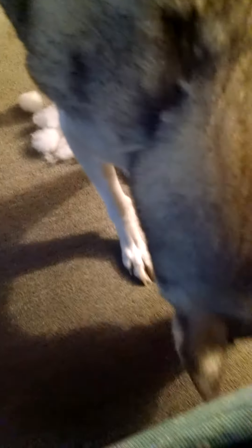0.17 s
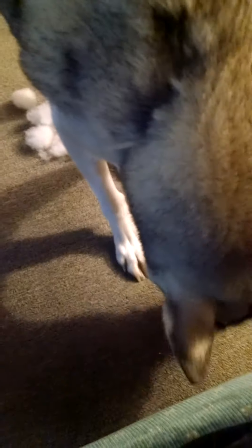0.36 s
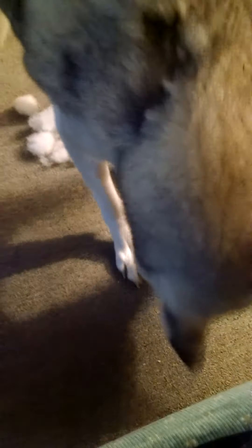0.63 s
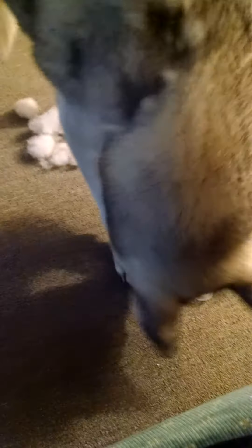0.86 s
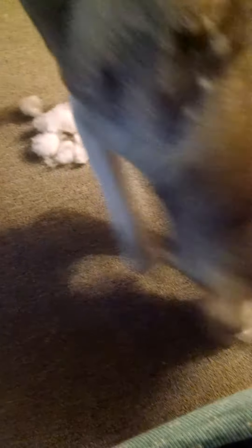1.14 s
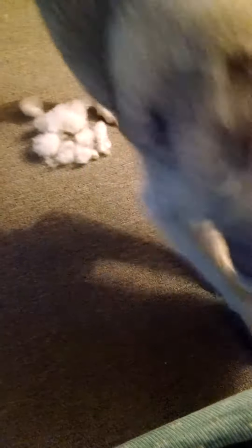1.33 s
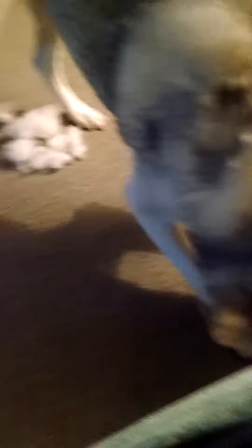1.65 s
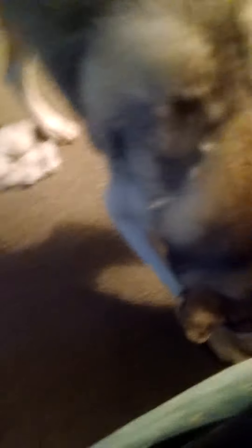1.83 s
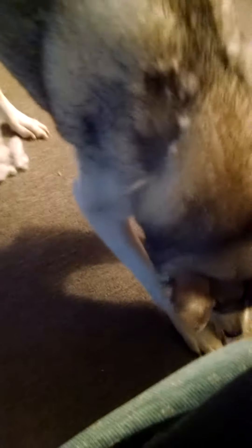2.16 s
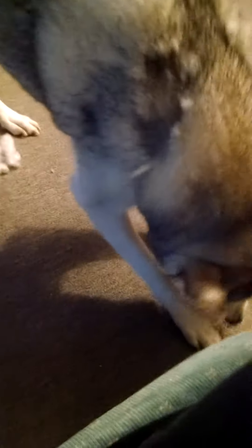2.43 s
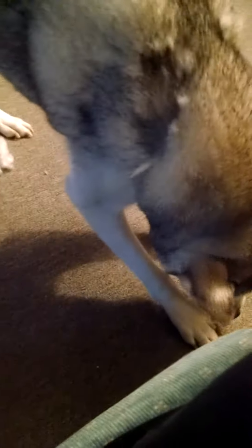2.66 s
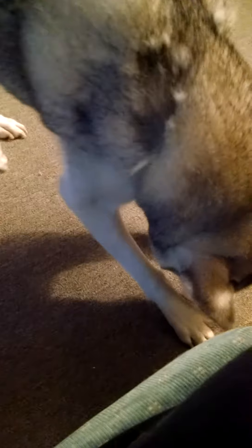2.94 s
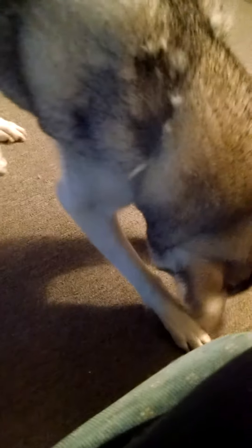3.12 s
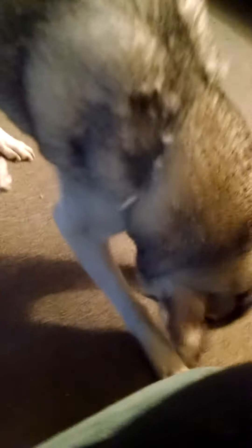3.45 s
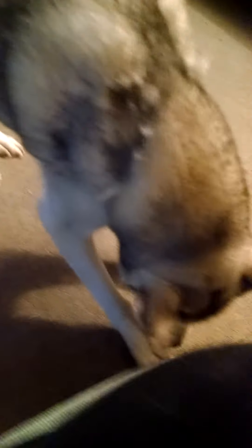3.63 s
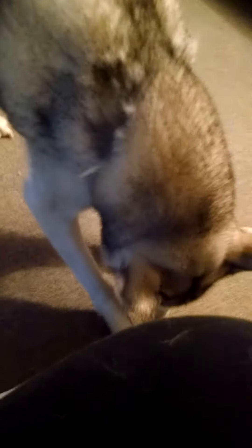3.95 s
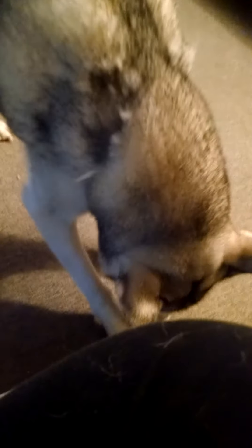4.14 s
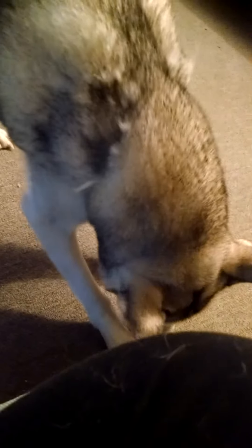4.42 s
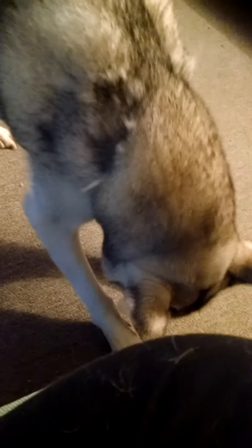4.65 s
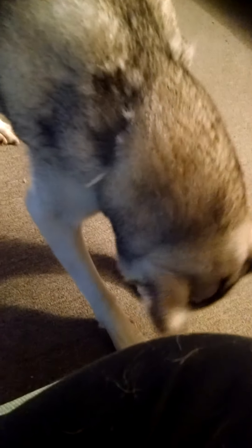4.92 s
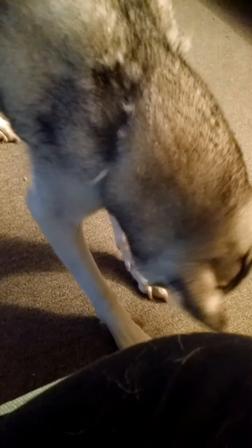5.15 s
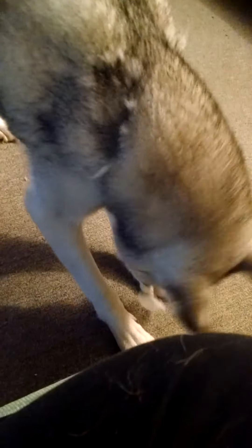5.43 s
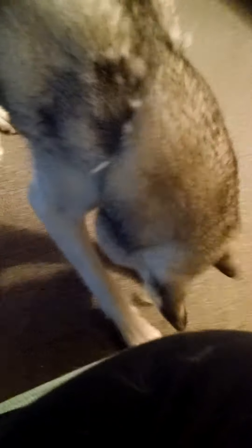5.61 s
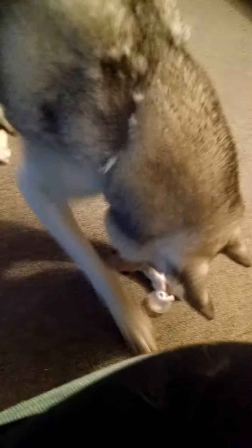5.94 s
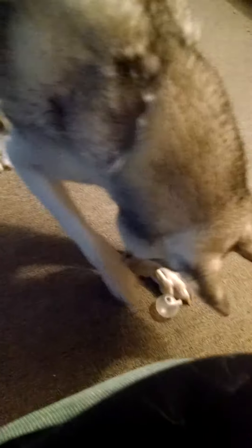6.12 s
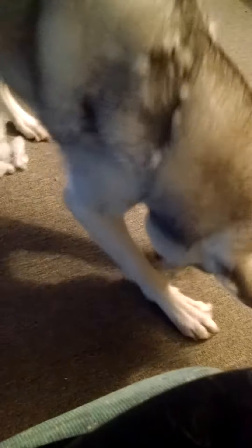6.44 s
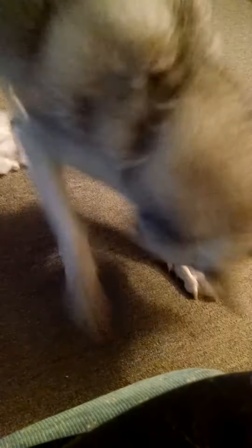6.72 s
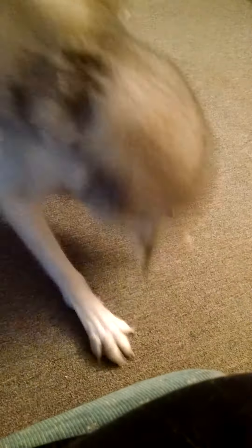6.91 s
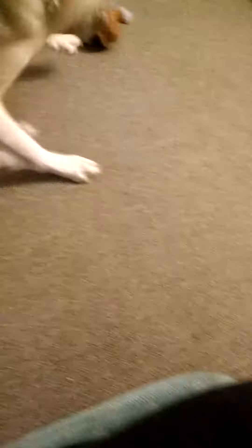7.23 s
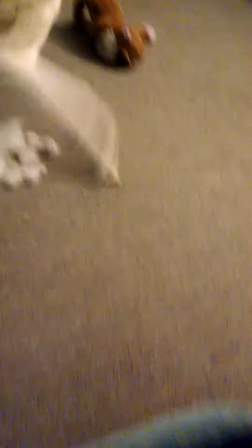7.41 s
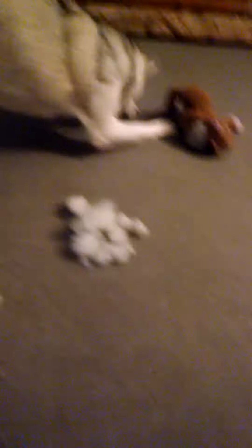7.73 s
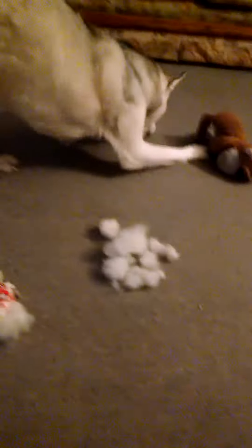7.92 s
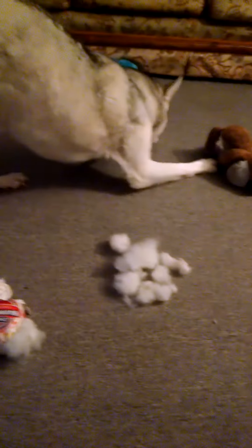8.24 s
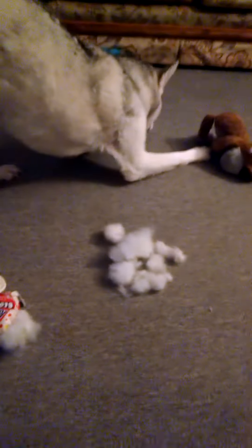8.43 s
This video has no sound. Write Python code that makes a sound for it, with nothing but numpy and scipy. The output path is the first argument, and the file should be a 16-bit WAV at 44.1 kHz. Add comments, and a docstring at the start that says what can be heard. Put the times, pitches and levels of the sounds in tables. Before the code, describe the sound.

A large dog bites a squeaky toy on carpet in a small living room, close to a handheld microphone. Brief raspy chirps come singly and in pairs, with small tooth clicks and a soft muffled whine midway. After a sparse stretch, paws and claws clatter, thump and scuff in a pounce, then sharp new squeaks. Low room murmur underneath.

```python
"""Dog and squeaky toy

A big dog chews a squeaky toy on the carpet of a small living room, close by.
Each bite drives air through a reed, a sum of harmonics whose pitch sags with the air pressure.
Teeth, toy and claws click as damped resonances; the dog whines once as a few unsteady harmonics.
Paws ring the floor modes and scuff as filtered grains, most strongly in a late pounce before new bites.
Room air, shaped noise with a faint hum, murmurs throughout."""
import sys
import numpy as np
from scipy import signal
from scipy.fft import rfft, irfft, next_fast_len
from scipy.io import wavfile

SR = 44100
rng = np.random.default_rng(int(sys.argv[2]) if len(sys.argv) > 2 else 0)


def master_out(mix):
    """Clip the mix to full scale and print it as 16-bit PCM to the path in sys.argv[1]."""
    frames = np.transpose(np.atleast_2d(mix))
    ceiling = np.clip(frames, -1, 1)
    pcm = np.round(ceiling * 32767).astype(np.int16)
    wavfile.write(sys.argv[1], SR, pcm)


N = 377937


def from_db(db):
    """Decibel law: amplitude ratio from level/dB."""
    return 10 ** (np.asarray(db) / 20)


def rms_one(x):
    """Power normalisation: scale to an RMS of 1."""
    return x / np.sqrt(np.mean(x ** 2) + 1e-20)


def peak_one(x):
    """Peak normalisation: scale to a largest excursion of 1."""
    return x / np.abs(x).max()


def at_hz(points, hz):
    """Interpolation on a logarithmic frequency axis."""
    f, value = np.transpose(points)
    return np.interp(np.log(np.maximum(hz, 1)), np.log(np.maximum(f, 1)), value)


def bin_hz(size):
    """Discrete Fourier analysis: the frequency/Hz of each bin."""
    return np.arange(size // 2 + 1) * SR / size


def coloured(x, spectrum):
    """Linear filtering: weight the spectrum by a table of f/Hz, level/dB."""
    size = x.shape[-1]
    gain = from_db(at_hz(spectrum, bin_hz(size)))
    return irfft(rfft(x) * gain, size)


def wobble(t, per_s):
    """Random modulation: normal draws, per_s a second, joined by straight lines."""
    return np.interp(t * per_s, np.arange(1024), rng.standard_normal(1024))


def grit(size):
    """White noise: equal mean power at all frequencies, for one short event."""
    return rng.standard_normal(SR // 2)[:size]


def resonance(x, hz, width_hz):
    """Two-pole resonance with a gain of 1 at its peak."""
    r = np.exp(-np.pi * width_hz / SR)
    feedforward = np.array([1, 0, -1]) * (1 - r * r) / 2
    feedback = [1, -2 * r * np.cos(2 * np.pi * hz / SR), r * r]
    return signal.lfilter(feedforward, feedback, x)


def knock(t, hz, damping):
    """Damped oscillation: one push on a heavily damped body gives a few dying swings."""
    return peak_one(np.sin(2 * np.pi * hz * t) * np.exp(-np.pi * damping * hz * t))


def add(out, s, sound):
    """Superposition: mix a sound into a track from time s."""
    at = max(int(s * SR), 0)
    out[..., at:at + sound.shape[-1]] += sound[..., :N - at]


REST_HZ = 738   # pitch of the reed when it barely sounds
FIRST_PRESSURE = 0.52   # share of the full pressure at which a slow bite starts to sound
LOUDER_DB_PER_HZ = 0.04   # the further the pitch falls short, the further the level drops


def reed_course(t, length, rise_s, top_hz, end_hz, bend):
    """Pressure-driven reed: pitch/Hz and level/dB swell to the hardest squeeze, then sag as the toy empties."""
    rise_s = np.clip(rise_s, .001, .9 * length)
    swell_hz = (top_hz - REST_HZ) * (1 - FIRST_PRESSURE) * np.maximum(1 - t / rise_s, 0) ** 2
    emptied = np.clip((t - rise_s) / (length - rise_s), 0, 1)
    sag = 1 - (1 - emptied) ** max(bend, .1)
    pitch = top_hz - swell_hz - (top_hz - end_hz) * sag
    effort_db = -LOUDER_DB_PER_HZ * (swell_hz + (top_hz - end_hz) * emptied)
    return pitch, effort_db


# resonances of reed and shell: f/Hz, level/dB
REED_MODES = [(500, -11.5), (850, 4.5), (1750, 5), (2600, -6.5), (3000, -5), (3450, -1), (3850, -5.5),
              (4300, -0.5), (4800, 1), (5400, -2.5), (6000, -0.5), (6500, -11), (7000, -2.5), (7700, 1),
              (8100, -0.5), (8450, -1), (8850, -4), (9250, -5), (10400, -6.5), (11300, -22.5),
              (12800, -17.5), (14400, -22), (15200, -25)]
# hiss of the escaping air: f/Hz, level/dB
JET_COLOUR = [(700, 3), (3000, -6.5), (9000, -10), (12000, -22)]
JET_SHARE = .6   # jet amplitude relative to the tone at full roughness
WAVER = .005   # spread of the pitch as a share of itself
# phase chatter of the upper overtones/rad, what full roughness adds/rad, draws a second
CHATTER, ROUGH_CHATTER, CHATTER_PER_S = .25, 1.3, 130
ATTACK_S = .0025


def squeak(length, rise_s, top_hz, end_hz, bend, level_db, octave_db, third_db, lower_db, upper_db, treble_db,
           whistle_hz, whistle_db, rough, flutter=0.023, patchy_db=6, surge_db=2.1,
           whistle_width_hz=330, release_s=0.0035):
    """Self-sustained reed oscillation: one bite sounds harmonics that rattle when overblown."""
    t = np.arange(int((length + .03) * SR)) / SR
    glide, effort_db = reed_course(t, length, rise_s, top_hz, end_hz, bend)
    pitch = glide * (1 + WAVER * wobble(t, 148.6) + flutter * rough * wobble(t, 953))
    phase = 2 * np.pi * np.cumsum(pitch) / SR
    k = np.arange(1, 20)[:, None]   # harmonic numbers

    # what the jaws let through, and the whistle of the outlet: f/Hz, level/dB
    jaws = [(1150, 0), (1450, octave_db), (2000, octave_db), (2250, third_db), (2900, third_db),
            (3200, lower_db), (4300, lower_db), (4700, upper_db), (6100, upper_db), (6600, treble_db)]
    outlet = [(whistle_hz - 2 * whistle_width_hz, 0), (whistle_hz - whistle_width_hz / 2, whistle_db),
              (whistle_hz + whistle_width_hz / 2, whistle_db), (whistle_hz + 2 * whistle_width_hz, 0)]

    # the folding shell favours changing overtones
    folds = np.tanh([wobble(t, 46.8) for _ in k])
    crumple_db = patchy_db * np.minimum(k / 4, 1) * folds
    filter_db = at_hz(REED_MODES, k * pitch) + at_hz(jaws, k * pitch) + at_hz(outlet, k * pitch)
    strength = from_db(filter_db + crumple_db)
    strength /= np.sqrt(np.sum(strength ** 2, axis=0))   # the colour shifts, the power stays

    # overblown, strong and weak beats alternate
    uneven = 1 + 2.23 * rough * (k > 2) * np.cos(phase / 2 + wobble(t, 34))
    chatter_depth = (CHATTER + ROUGH_CHATTER * rough) * np.minimum((k - 1) / 7, 1)
    chatter = chatter_depth * np.array([wobble(t, CHATTER_PER_S) for _ in k])
    start_phase = rng.uniform(0, 2 * np.pi, k.shape)
    tone = np.sum(strength * uneven * np.sin(k * phase + chatter + start_phase), axis=0)

    jet = grit(len(t)) * (1 + np.cos(phase))   # air escapes once a cycle
    for colour in (JET_COLOUR, REED_MODES, jaws, outlet):
        jet = coloured(jet, colour)
    voice = rms_one(rms_one(tone) + JET_SHARE * rough * rms_one(jet))
    gate = np.minimum(t / ATTACK_S, 1) * np.exp(-np.maximum(t - length, 0) / release_s)
    unsteady_db = surge_db * np.tanh(wobble(t, 89))   # the jaws do not press evenly
    return voice * gate * from_db(level_db + effort_db + unsteady_db)


MUZZLE_PAN_DB = 2.5   # left minus right
# bites on the squeaker: t/s, length/s, time to hardest squeeze/s, top f/Hz, end f/Hz,
# bend of the sag (over 1 = early, under 1 = late), level/dB, then what the jaws let through:
# octave/dB, third overtone/dB, lower middle/dB, upper middle/dB, treble/dB;
# outlet whistle f/Hz, whistle level/dB, roughness (0-1)
BITES = [(0.0, 0.01, 0.0009, 894, 824, 0.61, -19, 1.5, 1, 6, 5, 8, 7100, 7.4, 0.33),
         (.084, 0.079, 0.016, 978.3, 780, 0.57, -20, -0.5, 5.5, -1, -7, 2.5, 9300, 9.8, 0.099),
         (.325, 0.019, 0.012, 878, 810, 1.1, -16.5, 4, 11, 6, -2, 8, 6840, 13.4, 0.17),
         (.387, .076, 0.0406, 987, 850, .5, -21, 1, 7.5, -0.5, -4.5, 2.5, 8120, 9.2, 0.13),
         (1.515, 0.064, 0.00073, 1032, 768, 2.6, -16.5, 0.5, 5, -3.5, -3, -1, 7430, 6.5, 0.23),
         (2.008, 0.049, 0.0017, 835, 761, 1.42, -24, -14, -7, -6.5, -9, -13, 6820, 18.5, 0.097),
         (2.238, .026, 0.0022, 875, 818, 1.23, -26, -8.5, -3, -1, -15, -6, 7800, 6.3, 0.27),
         (2.286, 0.027, 0.01, 853, 810, 0.94, -26, -9.5, -5, -9, -0.5, -10, 7050, 18, 0.22),
         (2.608, 0.062, 0.027, 891, 843, 0.72, -24.5, -10.5, -2, -6.5, -11, -5, 7700, 5.1, 0.22),
         (2.694, 0.032, 0.021, 869, 835, 1, -24, -11, -5.5, -8, -14, -7, 7240, 17.6, 0.43),
         (2.876, 0.056, 0.026, 848, 789, 2, -28, -11, 6, -16, -11, -4, 8260, 5.5, 0.072),
         (2.956, 0.0075, .003, 1080, 1000, 0.69, -33.5, 6, -7, -6, -11, -19, 7700, 10, 0.24),
         (2.998, 0.017, 0.0047, 927, 868, 0.94, -18, -4.5, -4, -5.5, -2.5, -6.5, 7660, 13, 0.4),
         (3.186, 0.034, 0.00096, 897, 815, 2.22, -21, -3, 5.5, -3.5, 2.5, 0.5, 7700, 8.7, 0.65),
         (3.505, 0.047, 0.026, 868, 834, 1.6, -26.5, -4.5, -10, -1, -5.5, 1, 7880, 5.5, .12),
         (3.563, 0.074, .0026, 816, 748, 1.9, -31, -13, 5, -11, -13, -8.5, 8000, 13, .04),
         (3.672, 0.017, .002, 806, 778, 1.04, -26, -5, 6.5, -6, -6, -5.5, 7600, 8.1, 0.24),
         (3.78, 0.0087, 0.0017, 860, 830, 1.4, -25.5, -10, -17, -3.5, -8, -8, 7600, 9.5, 0.58),
         (3.961, 0.015, 0.0045, 778, 726, 0.69, -35, -15, 7, -7, -4, -8, 8050, 15, .11),
         (4.009, 0.0098, 0.0035, 1094, 986, 1.06, -24, -1, 4, 4, 5, 4.5, 8000, 13, .3),
         (4.021, 0.0117, 0.0015, 833, 782, 1, -27, -17, -6, -19, -11, -9, 7750, 12, 0.14),
         (4.538, 0.044, .001, 914, 791, 1.6, -23, -6, -7.5, -4, -15, -6.5, 7960, 10, 0.11),
         (5.263, 0.031, 0.0013, 878, 816, 1.3, -27, -4, -5, -5.5, -10, -5, 7880, 10, 0.13),
         (5.3, 0.073, 0.0019, 842, 738, 1.68, -31, -18, -5, -10, -17, -10, 8120, 13, 0.055),
         (6.531, 0.061, 0.011, 950, 796, 1.1, -18.5, 3, -2, 5.5, 7, 2.5, 7400, 8.8, 0.11),
         (6.775, 0.048, 0.013, 821, 795, 1, -26, 1.5, 3, -11, -11, -10.5, 7900, 12, 0.24),
         (7.7, 0.016, 0.0072, 1011, 931, 1, -14.5, 10, 17.5, 18.5, 11, 1.5, 7390, 25, 0.43),
         (7.722, 0.025, 0.0083, 1143, 1042, 0.47, -22.5, 2, 10.5, 5, -1, 1, 7300, 13, .15),
         (8.336, 0.021, 0.0031, 862, 784, 1.06, -28, 5, 2, -3, -5, -6, 8500, 5.6, 1),
         (8.412, 0.029, 0.023, 870, 857, 1.1, -23, -1.5, 2, -3.5, -5.5, -8.5, 7800, 7.2, 0.15)]


def squeaker():
    """Level difference between the channels places all bites where the muzzle points."""
    out = np.zeros(N)
    for s, *bite in BITES:
        add(out, s, squeak(*bite))
    return from_db([[MUZZLE_PAN_DB / 2], [-MUZZLE_PAN_DB / 2]]) * out


# colour of the still room: f/Hz, relative level/dB per Hz
AIR_COLOUR = [(20, -9), (60, -9), (90, -12), (110, -2), (145, -7), (190, -6), (235, 3.5), (270, -4),
              (318, 5.5), (350, -2), (385, 3.5), (450, -10), (680, -9), (820, -15), (1400, -17),
              (1850, -22.5), (2600, -26), (3600, -24), (5500, -27), (8500, -24), (12000, -31),
              (16000, -28.5)]
AIR_DB = -45.5
# hum of mains and household motors, and a faint electric whistle: f/Hz, level/dB
HUM_TONES = [(119.5, -59), (237, -61), (317.6, -57.5), (387.6, -63), (12937, -95)]


def room_air(likeness=0.91):
    """Partly coherent noise: a steady murmur of the house, with hum and a thin whistle as pure tones."""
    common, apart = rng.standard_normal((2, N))
    alike = np.clip(likeness, 0, 1)
    both_sides = np.sqrt(1 + alike) * common + np.sqrt(1 - alike) * apart * [[1], [-1]]
    air = coloured(both_sides, AIR_COLOUR)
    t = np.arange(N) / SR
    hum = sum(from_db(db) * np.sqrt(2) * np.sin(2 * np.pi * hz * t) for hz, db in HUM_TONES)
    return from_db(AIR_DB) * rms_one(air) + hum


# teeth, toy and claws knocking: t/s, level/dB, centre f/Hz
HARD_CONTACTS = [(0.783, -45, 1500), (1.938, -21.5, 895), (3.211, -17.5, 1390), (3.489, -17.5, 4950),
                 (3.587, -14, 376), (3.735, -19, 1270), (3.78, -13, 1900), (3.83, -31, 1160),
                 (3.947, -28, 1050), (4.005, -24, 1910), (4.012, -30, 1000), (5.556, -28.5, 1680),
                 (5.785, -44, 1480), (6.459, -32, 1250), (6.7833, -14, 1600), (6.791, -22, 1650),
                 (6.805, -8.5, 1520), (6.81, -11, 1300), (6.815, -4.5, 1110), (6.819, -10.5, 684),
                 (6.825, -17, 620), (6.832, -9, 450), (6.84, -11.5, 1110), (6.858, -32, 900),
                 (6.997, -18, 1550), (7.002, -29, 1800), (7.004, -16, 510), (7.071, -32, 595),
                 (7.108, -20, 1000), (7.171, -22.5, 1320), (7.2035, -10, 1440), (7.2123, -5.5, 1420),
                 (7.22, -12, 1260), (7.2265, -5.5, 1040), (7.234, -6.5, 1220), (7.2362, -18, 4250),
                 (7.386, -17, 1010), (7.578, -19.5, 620), (7.59, -35, 1200), (7.697, -10, 420),
                 (7.706, -10, 2050), (7.729, -29, 1180), (8.343, -23.5, 487)]


def clacks(damping=0.36, crunch_db=-8, crunch_s=0.0047, crunch_damping=0.28, snap_db=-16.0, snap_s=0.0013,
           snap_hz=3500):
    """Impact excitation: a hard contact is a sharp snap, a damped knock and a brief crunch as it slips."""
    out, t = np.zeros(N), np.arange(SR // 25) / SR
    for s, level_db, hz in HARD_CONTACTS:
        crunch = peak_one(resonance(grit(len(t)) * np.exp(-t / crunch_s), hz, crunch_damping * hz))
        snap = peak_one(resonance(grit(len(t)) * np.exp(-t / snap_s), snap_hz, snap_hz))
        body = peak_one(resonance(knock(t, hz, damping), hz, 2 * hz))
        clack = body + from_db(crunch_db) * crunch + from_db(snap_db) * snap
        add(out, s, from_db(level_db) * clack)
    return out


# paws landing on the carpeted floor: t/s, level/dB, centre f/Hz
LANDINGS = [(1.102, -35, 109), (1.161, -35.5, 70.5), (1.309, -37.5, 130.6), (1.494, -27, 158),
            (1.73, -25, 77.5), (1.911, -34, 81), (3.24, -38, 97), (3.587, -22, 276), (5.554, -30.5, 229),
            (6.782, -27.5, 216), (6.817, -18.5, 260), (6.831, -12.5, 285), (7.002, -16, 133),
            (7.132, -30, 169), (7.206, -21, 237), (7.385, -9, 189), (7.547, -17.5, 141),
            (7.569, -19.5, 183), (7.694, -12, 222), (7.759, -18.5, 132), (8.339, -27, 270)]
# modes of the carpeted floorboards: f/Hz, relative level/dB, decay time t60/s
FLOOR_MODES = [(31.2, 10, 1), (59, -6, 0.82), (80.7, 1, 0.19), (109.8, 0, 0.21), (138, -5, 0.26),
               (176.5, -2.5, 0.11), (218.4, -1, 0.14), (242.6, -1, 0.15), (309.3, 2, 0.093),
               (391, 6.5, 0.069), (546, 0.5, 0.065)]


def thuds(spread_octaves=0.99, chance_db=4.0, boom_db=-2.0, pad_db=-2.0, pad_damping=0.52, contact_s=0.0048):
    """Modal excitation: a soft paw pad pats the carpet and rings the floor modes near its centre frequency."""
    out, t = np.zeros(N), np.arange(SR // 3) / SR
    hz, mode_db, t60 = np.array(FLOOR_MODES).T[:, :, None]
    contact = 1 - np.exp(-t / contact_s)   # the pad yields, so force builds gradually
    for s, level_db, centre_hz in LANDINGS:
        reach = np.exp(-(np.log2(hz / centre_hz) / spread_octaves) ** 2 / 2)
        strength = reach * from_db(mode_db + chance_db * rng.standard_normal(hz.shape))
        sign = rng.choice([-1, 1], hz.shape)
        ringing = from_db(-60 * t / t60) * np.sin(2 * np.pi * hz * t)
        boom = peak_one(contact * np.sum(strength * sign * ringing, axis=0))
        pat = peak_one(contact * knock(t, centre_hz, pad_damping))
        add(out, s, from_db(level_db) * (from_db(boom_db) * boom + from_db(pad_db) * pat))
    return out


# paws, toy and the dog's weight dragging over the carpet: t/s, length/s, level/dB, centre f/Hz
DRAGS = [(1.737, 0.128, -43, 50), (3.712, 0.021, -45, 1000), (3.789, 0.37, -52, 550),
         (6.052, 0.15, -57.5, 1220), (6.465, 0.09, -50, 1000), (6.77, 0.046, -31.5, 1370),
         (6.806, 0.053, -26.5, 840), (6.808, 0.11, -39, 50), (7.045, 0.28, -37.5, 150),
         (7.06, 0.12, -36.5, 1020), (7.192, 0.016, -33, 1280), (7.217, 0.037, -25, 1230),
         (7.535, 0.083, -36.5, 740), (7.562, 0.28, -40, 149), (7.694, 0.14, -36.5, 1000)]


def scuffs(grain_db=6, grains_per_s=220, snags_per_s=200, snag_db=-3.5, damping=0.71, fibre_db=-23):
    """Friction noise: carpet loops rub in uneven grains and snag at random, with a thin hiss of fibres."""
    out = np.zeros(N)
    for s, length, level_db, hz in DRAGS:
        t = np.arange(int(length * SR)) / SR
        snags = grit(len(t)) * (rng.random(SR // 2)[:len(t)] < snags_per_s / SR)
        rubbing = grit(len(t)) * from_db(grain_db * wobble(t, grains_per_s))
        grains = rms_one(rubbing) + from_db(snag_db) * rms_one(snags)
        body = resonance(resonance(grains, hz, damping * hz), hz, 4.7 * hz)
        fibres = resonance(resonance(grains, 8500, 2400), 8500, 2400)
        rub = rms_one(body) + from_db(fibre_db) * rms_one(fibres)
        add(out, s, from_db(level_db) * rms_one(rub * np.sin(np.pi * t / length)))
    return out


# course of the dog's soft whine: t/s, pitch f/Hz, level/dB
WHINE_COURSE = [(3.761, 243, -62), (3.79, 258.5, -39), (3.868, 279, -44.5), (3.92, 309.5, -44.5),
                (3.97, 358.4, -38), (4.012, 337, -45), (4.05, 317, -70)]


def whine(overtone_db=(0, -6, -13, -18), jitter=0.0235):
    """Harmonic series on an unsteady pitch: a muffled note through a full mouth."""
    out, (s, hz, level_db) = np.zeros(N), np.transpose(WHINE_COURSE)
    t = np.arange(int((s[-1] - s[0]) * SR)) / SR
    pitch = np.interp(t + s[0], s, hz) * (1 + jitter * wobble(t, 81.2))
    phase = 2 * np.pi * np.cumsum(pitch) / SR
    note = sum(from_db(db) * np.sin((k + 1) * phase) for k, db in enumerate(overtone_db))
    add(out, s[0], rms_one(note) * from_db(np.interp(t + s[0], s, level_db)))
    return out


# reverberation time of the room: f/Hz, t60/s
ROOM_DECAY = [(100, 0.24), (600, 0.34), (1600, 0.28), (4200, 0.28), (11000, 0.26)]


def living_room(x, wet_db, early_db, early_s=0.006, gap_s=0.000883, apart=0.36):
    """Room impulse response: direct sound, early echoes off floor and furniture, a tail decaying by band."""
    t = np.arange(SR // 2) / SR
    white = rng.standard_normal(len(t)) + apart * rng.standard_normal((2, len(t)))
    hz, spectrum = bin_hz(len(t)), rfft(white)
    centres, t60s = np.transpose(ROOM_DECAY)
    tail = 0
    for share, t60 in zip(np.eye(len(t60s)), t60s):   # overlapping bands that add up to the whole
        band = irfft(spectrum * at_hz(np.c_[centres, share], hz), len(t))
        tail = tail + band * from_db(-60 * t / t60)
    echoes = rng.standard_normal(len(t)) + apart * rng.standard_normal((2, len(t)))
    early = echoes * np.exp(-t / early_s)
    after_gap = t > gap_s
    response = from_db(wet_db) * rms_one(tail * after_gap) + from_db(early_db) * rms_one(early * after_gap)
    response /= np.sqrt(len(t))
    response[:, 0] += 1   # direct sound
    response /= np.sqrt(np.sum(response ** 2) / 2)
    return signal.fftconvolve(x * np.ones((2, 1)), response, axes=1)[:, :N]


def scene():
    """Superposition of toy, teeth, paws and voice in the room, over its air."""
    toy = living_room(squeaker(), wet_db=-1.0, early_db=0.0, apart=0.85)
    knocks = living_room(clacks() + scuffs() + whine(), wet_db=-7.0, early_db=-4.5, apart=0.97)
    paws = living_room(thuds(), wet_db=-7.5, early_db=-8.0, apart=1.0)
    return toy + knocks + paws + room_air()


# stereo phase spread, left ahead of right: f/Hz, phase/rad
PHASE_SPREAD = [(0, 0), (30, 1.9), (130, 1.6), (230, 1.3), (400, 1.7), (550, 2.9), (680, 4.6), (860, 5.3),
                (1080, 6.2), (1900, 6.5), (2450, 9.2), (3050, 9.6), (3800, 12.3), (4450, 12.9),
                (5000, 15.4), (5850, 16), (6500, 18.4), (7250, 19.1), (7900, 21.9), (8600, 24.9),
                (9300, 25.3), (10200, 28.3), (16000, 42.5)]
# stereo level spread: f/Hz, left minus right/dB
LEVEL_SPREAD = [(30, -2), (90, -2), (220, 3.5), (400, 4), (550, 16.5), (720, 10.5), (1000, -1), (3000, 0),
                (7000, 0), (9500, -7.5), (14000, -2.5)]
STOPBAND_HZ = 16700


def record(dry):
    """Stereo filtering: the two channels differ in phase and level across frequency; a low-pass cuts the top."""
    size = next_fast_len(N + SR // 10)
    hz = bin_hz(size)
    balance_db = at_hz(LEVEL_SPREAD, hz)
    phase_gap = np.interp(hz, *np.transpose(PHASE_SPREAD))
    channels = np.array([from_db(balance_db / 2), from_db(-balance_db / 2) * np.exp(-1j * phase_gap)])
    heard = irfft(rfft(dry, size) * channels, size)[:, :N]
    low_pass = signal.cheby2(14, 70, STOPBAND_HZ, fs=SR, output="sos")
    return signal.sosfilt(low_pass, heard)


dry = scene()
out = record(dry)
master_out(out)
```